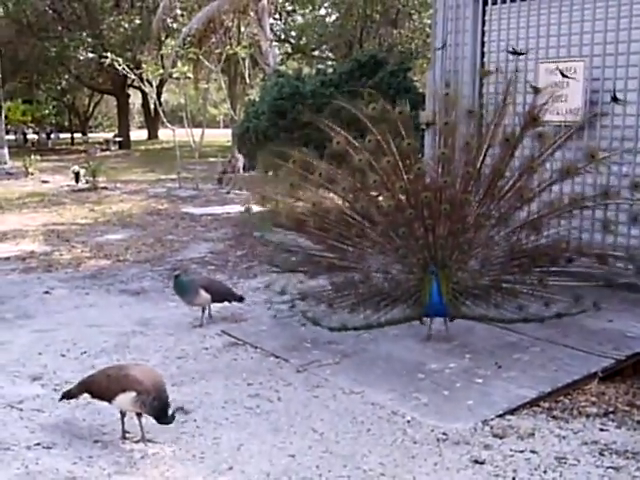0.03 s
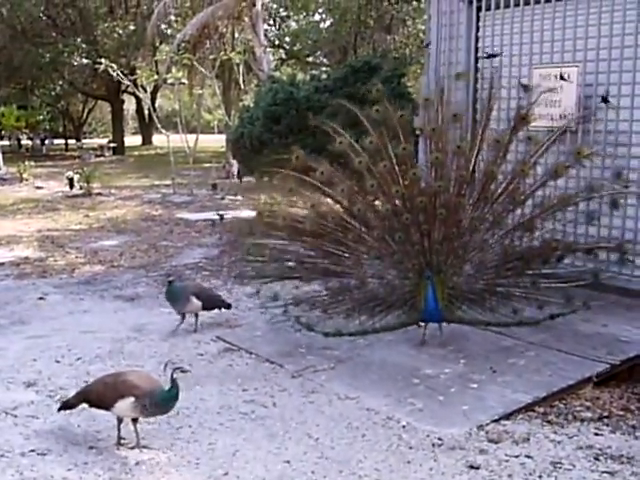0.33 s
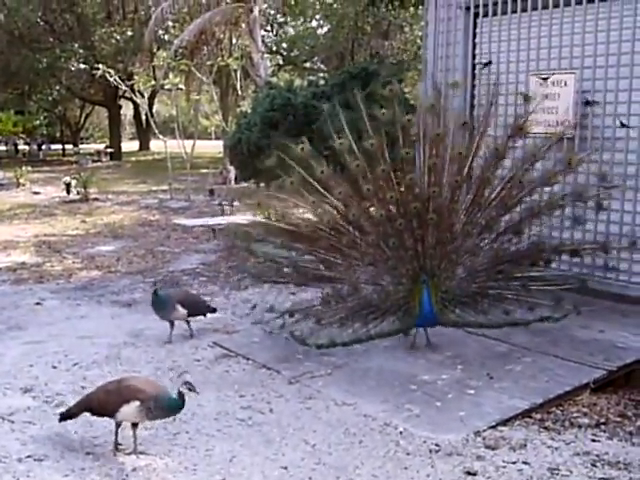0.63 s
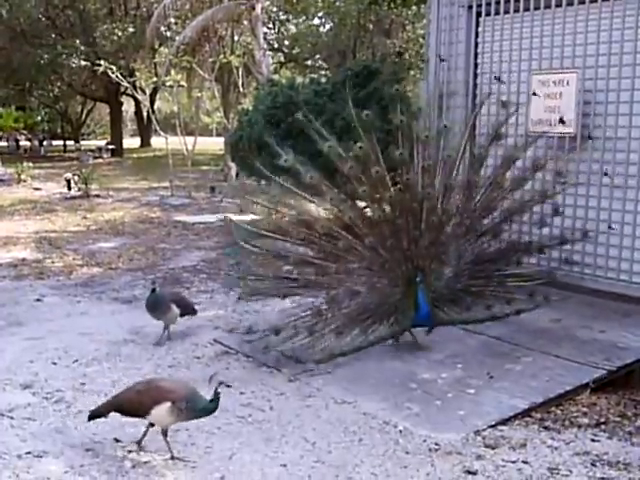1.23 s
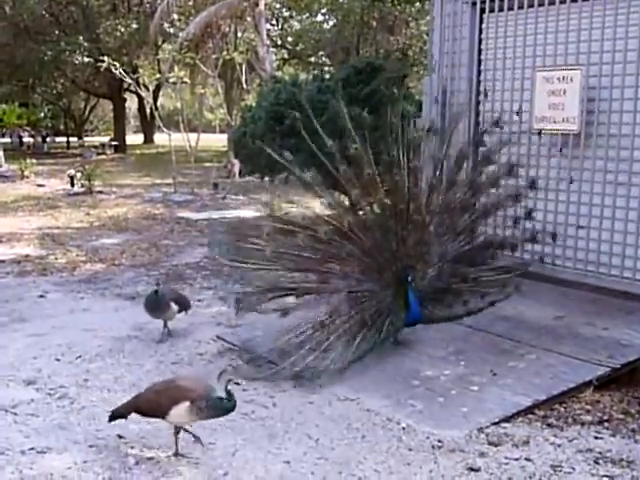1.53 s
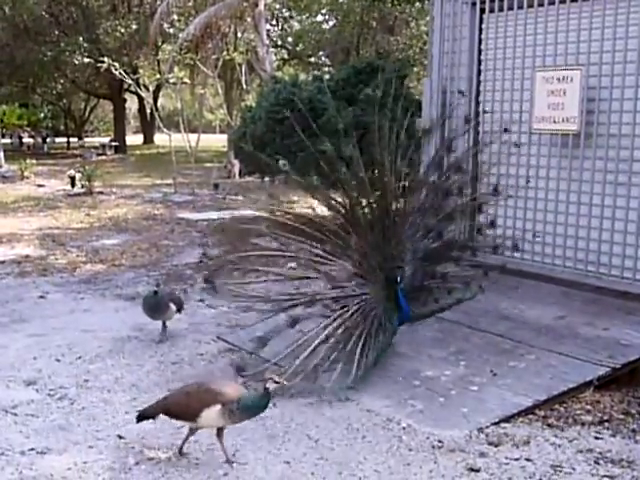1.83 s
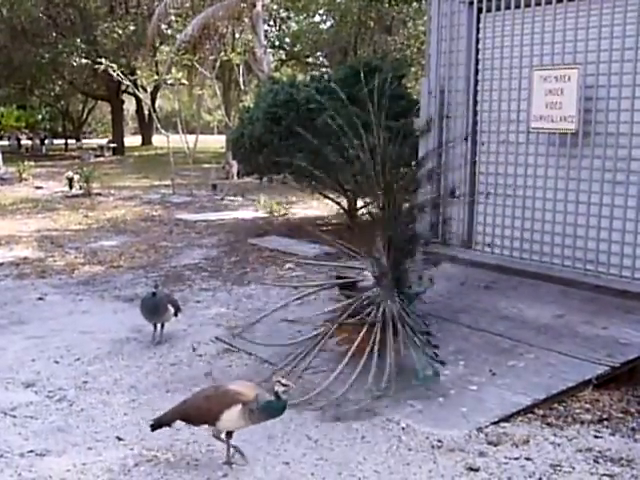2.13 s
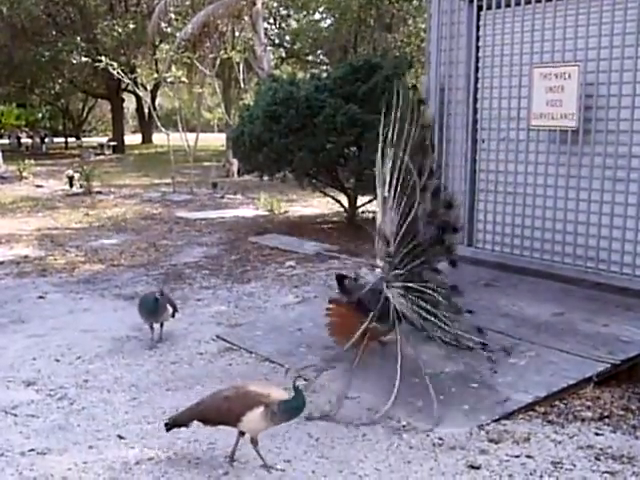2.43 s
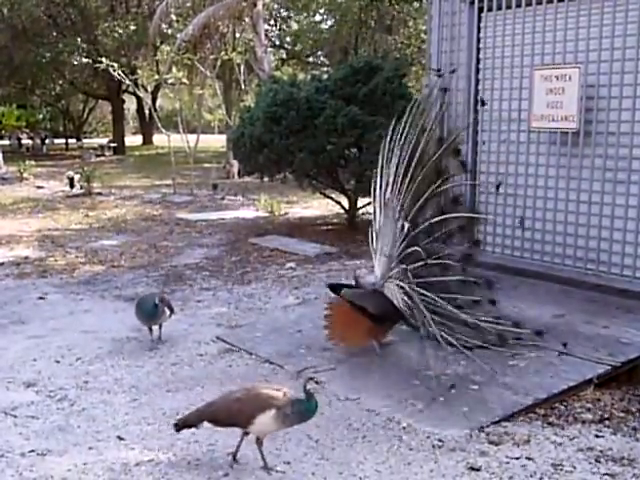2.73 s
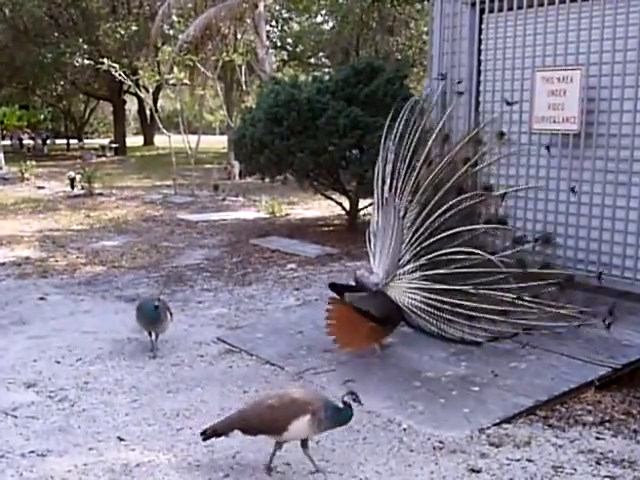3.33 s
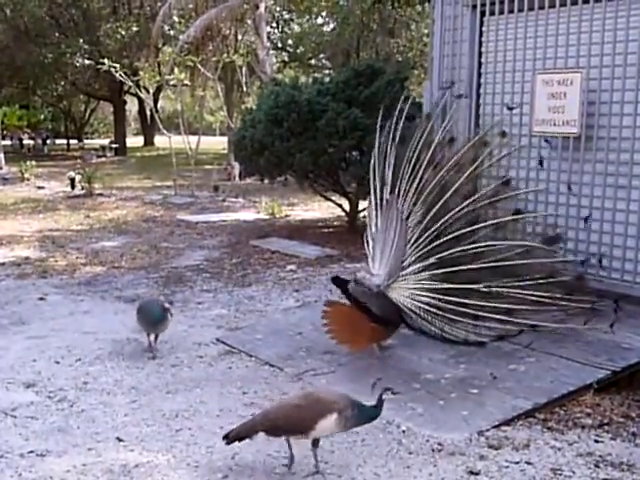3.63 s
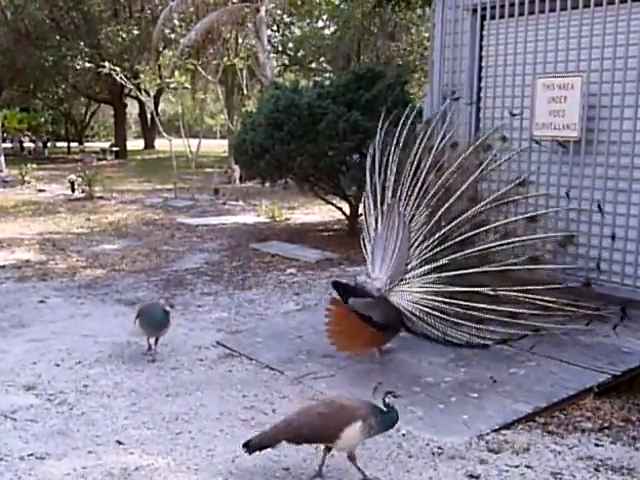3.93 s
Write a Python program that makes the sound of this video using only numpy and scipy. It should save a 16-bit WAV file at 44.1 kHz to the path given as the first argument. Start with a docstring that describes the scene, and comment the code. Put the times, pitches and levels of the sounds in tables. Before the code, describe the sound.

A peacock's fanned tail feathers rustle and rattle as it turns outdoors, the quills clicking and scraping with soft knocks on concrete. The feathers fall quiet about halfway, leaving light wind rumbling on the microphone.

```python
"""A peacock turns on a concrete slab beside a wall, its train of tail feathers fanned out.
The stiff quills drag over each other and the ground in short scrapes, catch and snap free.
The soft parts of the feathers rustle, and duller knocks go with its steps.
Light wind rumbles on the microphone over a distant outdoor hush."""
import sys
import numpy as np
from scipy import signal
from scipy.fft import rfft, irfft
from scipy.io import wavfile

SR = 44100
rng = np.random.default_rng(int(sys.argv[2]) if len(sys.argv) > 2 else 0)


def materialize(psi):
    """Save the field psi as 16-bit PCM at rate SR to the path in sys.argv[1].

    A 1-D psi becomes a single channel; in a 2-D psi each row is a channel.
    """
    bounded = np.clip(np.atleast_2d(psi).T, -1, 1)
    quanta = np.round(bounded * 32767).astype(np.int16)
    wavfile.write(sys.argv[1], SR, quanta)


N = 176400  # 4 seconds

# how strongly the quills ring at each frequency: f/Hz, level/dB
QUILL_RING = [(300, -29.5), (1200, -5.5), (1650, -21), (1930, -2), (2250, -15), (2600, -1), (3000, -2),
              (3350, -7.5), (3700, -4.5), (4400, -8), (4850, -7.5), (5400, -16), (6200, -16.5), (7000, -20)]


def from_db(db):
    """Turn decibels into a number to multiply a sound by."""
    return 10 ** (np.asarray(db) / 20)


def rms_one(x):
    """Scale a sound so that its average strength (rms) is 1."""
    return x / np.sqrt(np.mean(x ** 2) + 1e-20)


def gain_curve(rows):
    """Join (t/s, level/dB) points into a volume for every sample."""
    return from_db(np.interp(np.arange(N) / SR, *np.transpose(rows)))


def response(spectrum, size=4096):
    """Build a filter (its answer to one click) from (f/Hz, level/dB) points."""
    hz, db = np.transpose(spectrum)
    grid_hz = np.maximum(np.arange(size // 2 + 1) * SR / size, 1)
    gains = from_db(np.interp(np.log(grid_hz), np.log(hz), db))
    # these steps make the ringing come after the click, never before it
    cepstrum = irfft(np.log(gains))[:size // 2]
    one_sided = np.r_[cepstrum[0], 2 * cepstrum[1:]]
    return irfft(np.exp(rfft(one_sided, size)))


def through(x, impulse):
    """Pass a sound through a filter, keeping its length."""
    return signal.fftconvolve(x, impulse)[:len(x)]


def resonance(x, hz, width_hz):
    """Make a sound ring around one pitch; a wider band dies sooner."""
    r = np.exp(-np.pi * width_hz / SR)
    return signal.lfilter([1, 0, -1], [1, -2 * r * np.cos(2 * np.pi * hz / SR), r * r], x + 1e-18)


def drift(per_s):
    """A wandering curve that moves to a new random value per_s times a second."""
    return rms_one(np.interp(np.arange(N) / SR * per_s, np.arange(N), rng.standard_normal(N)))


def slips(size, per_s, spread_db):
    """Tiny slips: clicks of uneven strength at random times."""
    strength = from_db(spread_db * np.minimum(rng.exponential(1, size), 4))
    happens = rng.random(size) < per_s / SR
    return happens * strength * rng.choice([-1, 1], size)


def add(out, start_s, sound):
    """Mix a sound in at the given time."""
    i = int(start_s * SR)
    out[i:i + len(sound)] += sound[:N - i]


def air(tone):
    """Steady noise of strength 1, shaped by (f/Hz, level/dB) points."""
    noise = rng.standard_normal(N + SR)
    return rms_one(through(noise, response(tone, size=16384))[SR:])


def distant_hush():
    """The faint, steady noise of the outdoors far away."""
    # tone of the hush: f/Hz, relative level/dB
    tone = [(76, -28), (130, -2), (160, -2.5), (185, -8.5), (260, -13.5), (400, -18), (570, -21.5),
            (780, -18), (1060, -25.5), (1350, -29.5), (3000, -37), (5100, -38.5), (5600, -46.5),
            (6100, -50.5), (6500, -67), (7200, -86.5)]
    return from_db(-38) * air(tone)


def wind_rumble():
    """Light wind on the microphone makes a deep rumble that rises and falls."""
    # strength of the wind: t/s, level/dB
    levels = [(0, -23), (.15, -31), (.5, -30), (.9, -30), (1.1, -25.5), (1.4, -25), (1.8, -27.5),
              (2.1, -32), (2.45, -30.5), (2.68, -26.5), (2.92, -30.5), (3.35, -29.5), (3.7, -32),
              (4, -26.5)]
    # tone of the rumble: f/Hz, relative level/dB
    tone = [(12, -4), (25, -1), (45, -2), (56, -3), (70, 0), (84, -3.5), (100, -4.5), (125, -10),
            (160, -14.5), (250, -30.5), (600, -66)]
    return gain_curve(levels) * air(tone)


def wind_puffs(size=8192, rise_s=0.0051):
    """A puff of air gives the microphone one or two slow swings."""
    # single puffs: t/s, level/dB, f/Hz
    puffs = [(2.238, -15.5, 48), (2.759, -15.5, 35.8), (2.821, -13, 65.3), (3.379, -18, 36)]
    out, t = np.zeros(N), np.arange(size) / SR
    swell = t / rise_s * np.exp(1 - t / rise_s)
    for start_s, db, hz in puffs:
        add(out, start_s, from_db(db) * swell * np.sin(2 * np.pi * hz * t))
    return out


def air_flutter():
    """A low flutter of the air, strongest while the fan of feathers swings."""
    # strength of the flutter: t/s, level/dB
    levels = [(0, -46.5), (.3, -44.5), (.6, -39), (.85, -40), (1.1, -39), (1.3, -33), (1.52, -30.5),
              (1.8, -37.5), (1.95, -34), (2.3, -40.5), (2.8, -40.5), (3.3, -48), (4, -49)]
    # tone of the flutter: f/Hz, relative level/dB
    tone = [(40, -12), (100, 1), (160, -1), (215, -0.5), (290, -8), (380, -9.5), (500, -17.5), (1000, -26),
            (2000, -49)]
    return gain_curve(levels) * air(tone)


def yard_echo(x, size=16384, wall_s=0.026, wall_db=-23.5, tail_s=0.056, tail_db=-18.5):
    """Add one echo from the wall and a short tail of scattered sound from the yard."""
    t = np.arange(size) / SR
    tail = rng.standard_normal(size) * from_db(-60 * t / tail_s) * (t > .002)
    echoes = from_db(tail_db) * tail / np.sqrt(np.sum(tail ** 2))
    echoes[int(wall_s * SR)] += from_db(wall_db)
    return x + through(x, echoes)


def feather_rustle(flicker_db=6.5, tick_db=-10):
    """The vanes (the soft sides of the feathers) brush each other while the quills tick lightly."""
    # strength of the rustle: t/s, level/dB
    levels = [(.33, -62), (.40, -57.5), (.48, -49), (.55, -52.5), (.66, -53.5), (.77, -60.5), (.83, -41.5),
              (.90, -54), (1.02, -42.5), (1.13, -52), (1.24, -51), (1.45, -41), (1.52, -43), (1.58, -41),
              (1.65, -45), (1.78, -40.5), (1.89, -53.5), (1.96, -41.5), (2.08, -56), (2.15, -43.5),
              (2.21, -50.5), (2.32, -61), (2.6, -86)]
    # tone of the vanes: f/Hz, relative level/dB
    tone = [(250, -7), (600, -15), (1100, 5), (1600, -13), (2000, 2), (2300, -5.5), (2900, -6.5),
            (4200, -4), (5200, -2.5), (6500, -24.5)]
    grains = slips(N, per_s=3500, spread_db=3.5) * from_db(flicker_db * drift(per_s=60))
    vanes = rms_one(through(grains, response(tone)))
    taps = slips(N, per_s=170, spread_db=1.5)
    ticks = rms_one(through(taps, response(QUILL_RING)))
    return gain_curve(levels) * (vanes + from_db(tick_db) * ticks)


def slab_knocks(size=4096, rise_s=0.0005, decay_s=.006):
    """Feet and train knock on the slab: soft, gritty bumps with one dull ring each."""
    # knocks: t/s, level/dB, f/Hz
    knocks = [(.815, -30, 370), (.824, -36, 950), (.937, -40, 1200), (.944, -32, 380), (0.981, -50, 1200),
              (1.279, -25.5, 980), (1.278, -29.5, 357), (1.280, -36.5, 1900), (1.410, -26.5, 940),
              (1.413, -33, 1880), (1.424, -48, 426), (1.479, -35.5, 900), (1.544, -30.5, 300),
              (1.545, -34, 640), (1.618, -28.5, 694), (1.619, -31, 840), (1.669, -34.5, 1180),
              (1.738, -33.5, 1220), (1.763, -40, 1330), (1.946, -28, 336), (2.152, -36.5, 750)]
    out, t = np.zeros(N), np.arange(size) / SR
    contact = (1 - np.exp(-t / rise_s)) * np.exp(-t / decay_s)
    contact /= contact.max()
    contact_rms = np.sqrt(np.mean(contact ** 2))
    for start_s, db, hz in knocks:
        grit = contact * rng.standard_normal(size)
        width_hz = hz / 2.7
        knock = resonance(resonance(grit, hz, width_hz), hz, width_hz)
        add(out, start_s, from_db(db) * rms_one(knock) * contact_rms)
    return out


def quill_scrapes(size=4096, release_s=.003, gain_db=-5):
    """A dragging quill makes a fast run of tiny slips that set the quills ringing, then die away."""
    # drags: t/s, length/s, relative level/dB, f/Hz
    drags = [(0.384, 0.048, -40.5, 3000), (0.45, 0.0051, -39.5, 2800), (0.507, 0.0048, -20, 3200),
             (0.528, 0.007, -31.5, 3000), (0.545, 0.007, -38, 3000), (0.619, 0.007, -44, 3500),
             (0.934, 0.0091, -19.5, 3500), (0.979, 0.0091, -17, 3400), (1.002, 0.007, -32, 3600),
             (1.037, 0.0046, -34, 3000), (1.222, 0.0039, -39.5, 3100), (1.279, 0.0034, -35, 2900),
             (1.336, 0.0029, -33, 3700), (1.345, 0.0054, -22, 3500), (1.408, 0.0099, -21.5, 3300),
             (1.422, 0.0104, -23, 3400), (1.439, 0.017, -25.5, 3300), (1.462, 0.0057, -35, 3300),
             (1.479, 0.0029, -26, 2800), (1.552, 0.022, -42, 3700), (1.57, 0.0017, -22, 3100),
             (1.618, 0.00395, -35, 3300), (1.67, 0.0026, -46, 3200), (1.72, 0.0085, -31, 3300),
             (1.766, 0.0069, -30, 3600), (1.802, 0.011, -29.5, 3000), (1.811, 0.011, -24.5, 3300),
             (1.942, 0.0085, -40, 3100), (2.038, 0.011, -44, 3400), (2.056, 0.0037, -47, 3000),
             (2.118, 0.0072, -40, 3800), (2.145, 0.0089, -52, 3700)]
    out, t = np.zeros(N), np.arange(size) / SR
    quill = response(QUILL_RING)
    for start_s, length_s, db, hz in drags:
        stroke = np.exp(-np.maximum(t - length_s, 0) / release_s)
        stroke_rms = np.sqrt(np.mean(stroke ** 2))
        friction = stroke * slips(size, per_s=2300, spread_db=2.5)
        scrape = through(resonance(friction, hz, width_hz=1540), quill)
        add(out, start_s, from_db(db + gain_db) * rms_one(scrape) * stroke_rms)
    return out


def quill_snaps(size=2048, grit_decay_s=0.0011, gain_db=-3):
    """A caught quill snaps free: one sharp click and a little grit ring in the quills."""
    # snaps: t/s, relative level/dB, f/Hz
    snaps = [(0.4252, -28, 2900), (0.5129, -15.5, 3000), (0.5508, -21, 2900), (0.5562, -26.5, 2900),
             (0.6141, -17, 3900), (0.6198, -20.5, 4000), (0.6349, -31, 3300), (0.6422, -28, 2500),
             (0.8128, -25.5, 4400), (0.828, -21, 3200), (0.8475, -28.5, 3070), (0.8548, -30, 3200),
             (0.886, -24, 2900), (0.935, -11, 3500), (0.9473, -15, 3500), (0.9804, -8.5, 3300),
             (0.9835, -7, 3500), (1.0068, -16, 3700), (1.041, -28, 3000), (1.0498, -28, 3200),
             (1.0535, -16, 3300), (1.293, -19, 3500), (1.3302, -17, 3300), (1.3444, -12, 3500),
             (1.3471, -2, 3500), (1.3897, -25, 3920), (1.4083, -4, 3400), (1.413, -11, 3200),
             (1.4236, -14, 3400), (1.4316, -8, 3600), (1.4392, -20, 3500), (1.4451, -16, 3400),
             (1.4481, -16.5, 3200), (1.6702, -13, 3200), (1.678, -20, 3000), (1.6915, -22.5, 2980),
             (1.714, -8.5, 3700), (1.733, -16, 3300), (1.741, -1.5, 3600), (1.7495, -20, 3300),
             (1.7629, -1.5, 3600), (1.7668, -6.5, 3700), (1.8134, -13, 3200), (1.819, -26, 3100),
             (1.9607, -32, 3600), (1.987, -33.5, 3300), (2.067, -33, 3220), (2.1336, -23, 2900),
             (2.1462, -25, 3600), (2.1504, -23.5, 3800)]
    out, t = np.zeros(N), np.arange(size) / SR
    quill = response(QUILL_RING)
    click = t == 0
    for start_s, db, hz in snaps:
        grit = 0.13 * rng.standard_normal(size) * np.exp(-t / grit_decay_s)
        snap = through(resonance(click + grit, hz, width_hz=1180), quill)
        add(out, start_s, from_db(db + gain_db) * snap / np.abs(snap).max())
    return out


def scene():
    """Mix the bird in its yard with the wind and the hush, in one channel."""
    bird = yard_echo(quill_snaps() + quill_scrapes() + slab_knocks() + feather_rustle())
    wind = wind_rumble() + air_flutter() + wind_puffs()
    return (bird + wind + distant_hush())[None]


def record(dry, low_cut_hz=12, high_cut_hz=6400):
    """Drop the deepest bass and cut the high treble steeply."""
    bass_cut = signal.butter(2, low_cut_hz, "high", fs=SR, output="sos")
    treble_cut = signal.butter(24, high_cut_hz, fs=SR, output="sos")
    return signal.sosfilt(treble_cut, signal.sosfilt(bass_cut, dry))


dry = scene()
out = record(dry)
materialize(out)
```